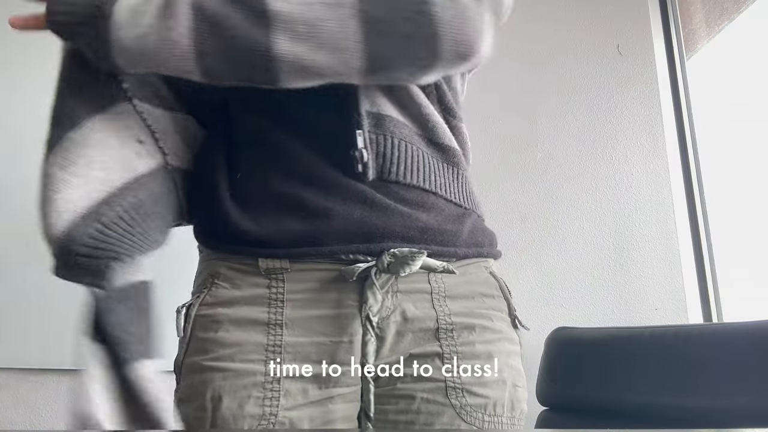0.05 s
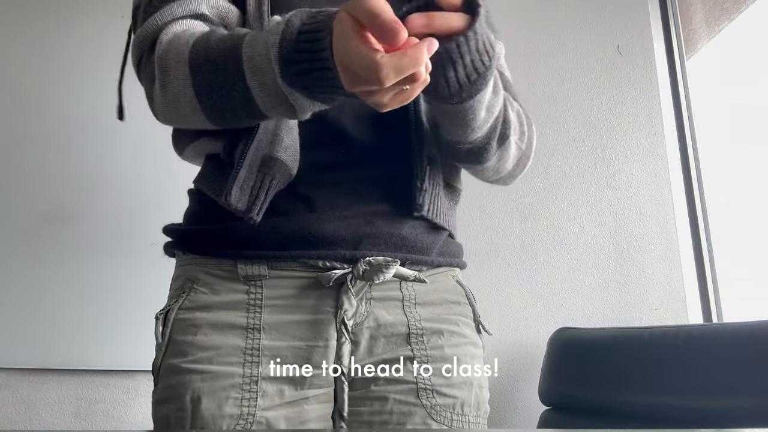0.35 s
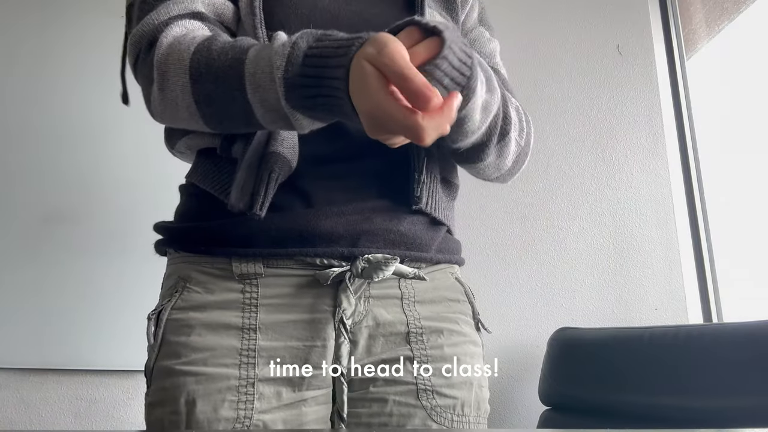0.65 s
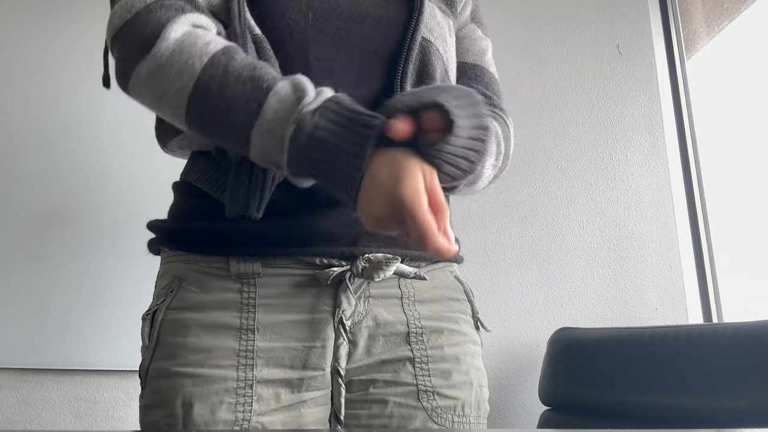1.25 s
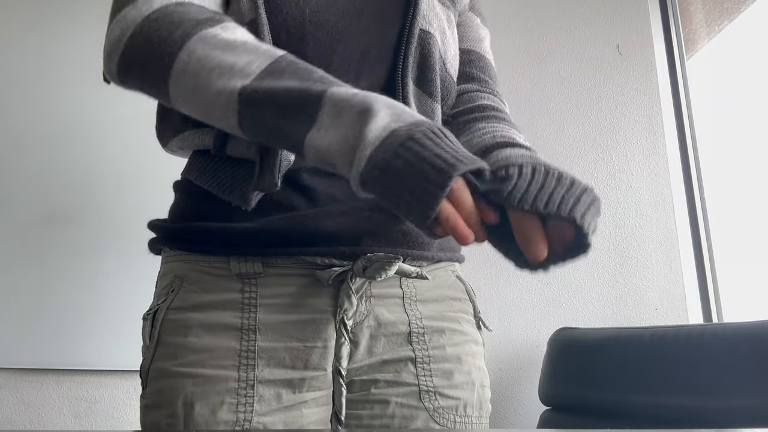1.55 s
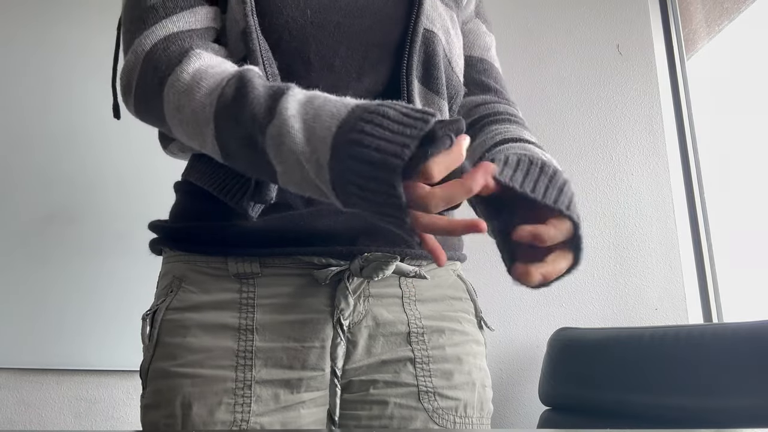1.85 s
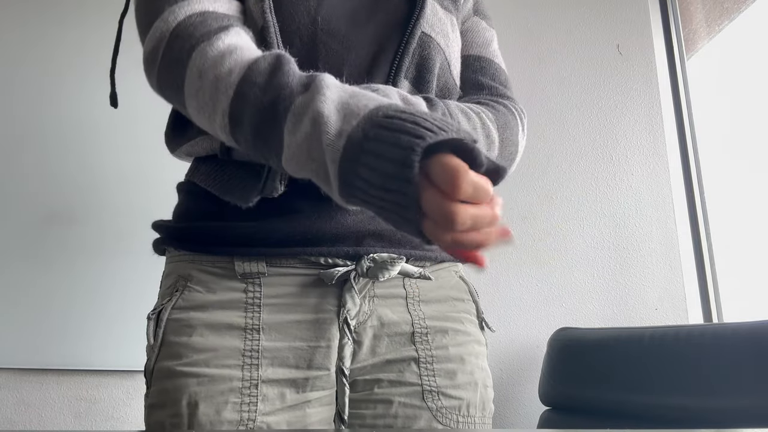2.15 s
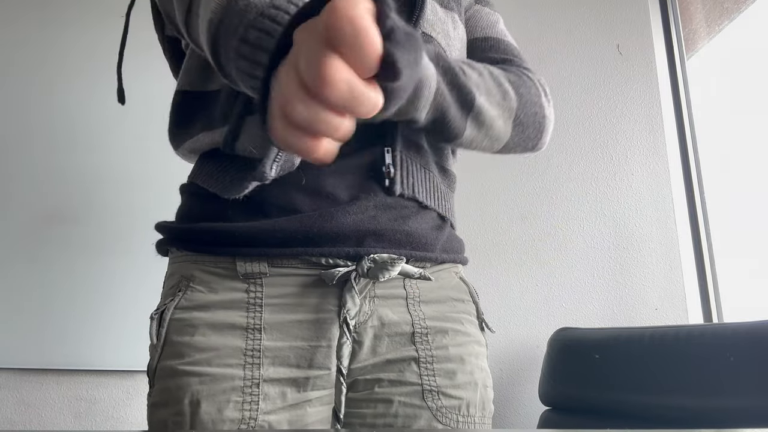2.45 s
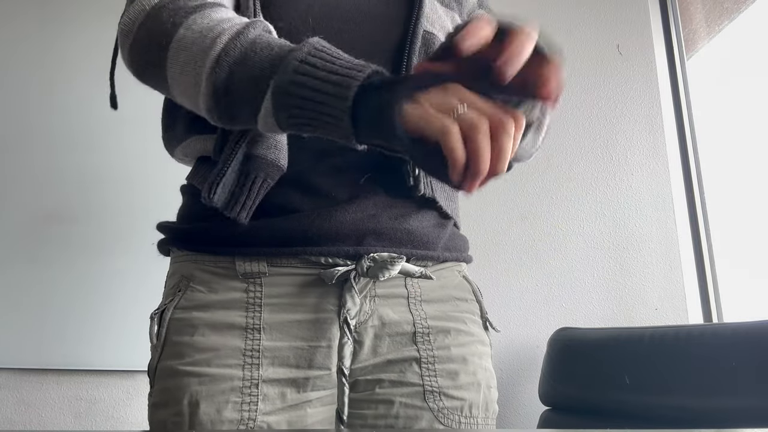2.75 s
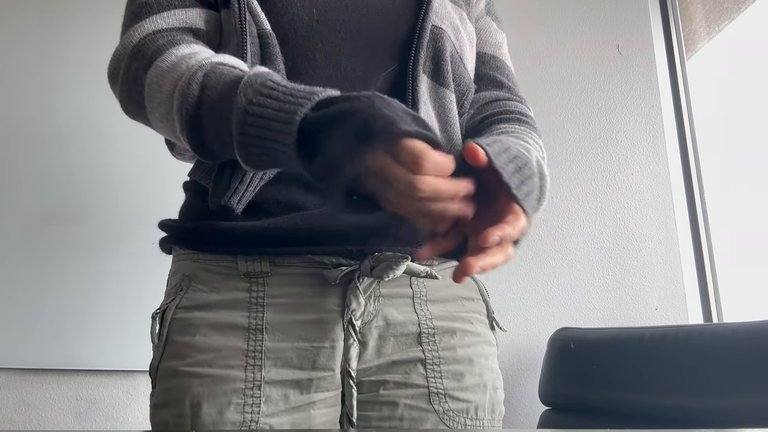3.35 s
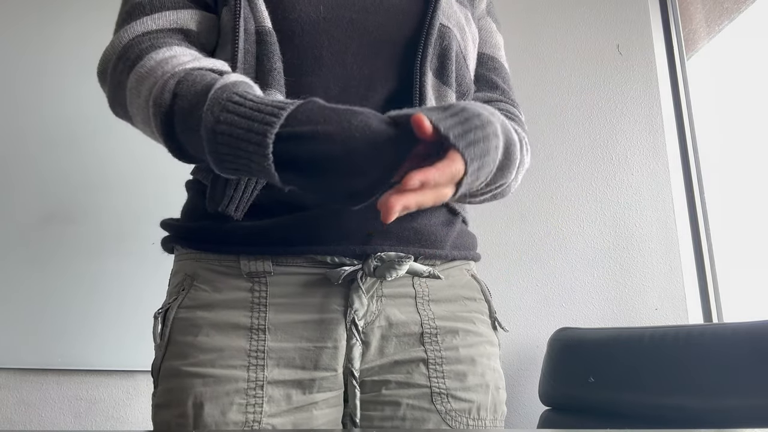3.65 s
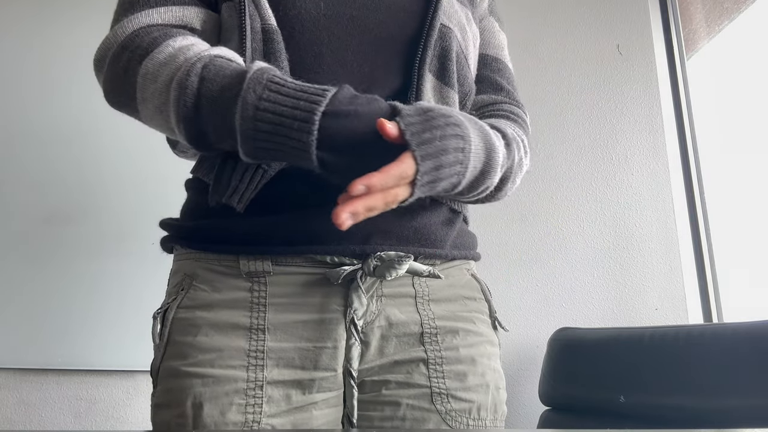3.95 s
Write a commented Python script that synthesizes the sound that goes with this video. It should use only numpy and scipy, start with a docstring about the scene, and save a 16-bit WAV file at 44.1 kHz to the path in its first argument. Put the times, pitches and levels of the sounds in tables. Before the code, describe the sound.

Soft, close rustling of sweater sleeves being pulled and brushed, over a low ventilation hum.

```python
"""Ventilation rumbles and hums throughout in a quiet room. From the first instant, knitted sleeves are
tugged over the wrists close to two microphones: by friction, folds rustle dully and fibres hiss.
Between 0.1 and 0.2 s something small and hard knocks, rebounds and rings on. From about 1 s a fold now
and then flicks free, and the strongest stroke peaks near 1.5 s. From 2 s on, single threads tick
as they snap loose among the continuing strokes."""
import sys
import numpy as np
from scipy import signal
from scipy.fft import rfft, irfft
from scipy.io import wavfile
from scipy.ndimage import uniform_filter1d, map_coordinates

SR = 44100
rng = np.random.default_rng(int(sys.argv[2]) if len(sys.argv) > 2 else 0)


def wrap_up_sound(samples):
    """Save the sound to the file named by the first command line argument, as 16-bit audio."""
    columns = np.atleast_2d(samples).T
    # keep every value between -1 and 1, then stretch to whole-number steps
    tamed = np.clip(columns, -1, 1)
    steps = np.round(tamed * 32767).astype(np.int16)
    wavfile.write(sys.argv[1], SR, steps)


N = 176400
FREQS = np.arange(N // 2 + 1) * SR / N  # f/Hz
FOLD_DIFFUSE = 0.49  # "diffuse" is the share of the power that arrives by way of the walls


def undb(db):
    """Amplitude ratio of a level: a factor of ten per 20 dB."""
    return 10 ** (np.asarray(db) / 20)


def unit(x):
    """Normalisation to an rms of 1."""
    return x / np.sqrt(np.mean(x ** 2))


def over_hz(points):
    """Interpolation of (f/Hz, value) points on a logarithmic frequency axis."""
    hz, value = np.array(points, float).T
    return np.interp(np.log(FREQS + 1e-3), np.log(hz), value)


def resonance(hz, width):
    """Lorentzian resonance curve; width is the full span in Hz at half gain."""
    return 1 / (1 + ((FREQS - hz) / (width / 2)) ** 2)


def soft_band(hz, octaves):
    """Band-pass gain, Gaussian in log frequency."""
    return np.exp(-.5 * (np.log2((FREQS + 1) / hz) / octaves) ** 2)


def wander(t, per_s):
    """Random modulation: a spline through Gaussian values, with a spread near 1."""
    return map_coordinates(rng.standard_normal(4096), [t * per_s], order=3, mode="wrap")


def noise():
    """Three incoherent white noises: the direct sound and the diffuse field at each microphone."""
    return rng.standard_normal((3, N))


def running_rms(pair, samples):
    """Envelope of a stereo signal: the root of its short-time mean power."""
    return np.sqrt(uniform_filter1d(np.mean(pair ** 2, axis=0), size=samples))


def microphones(x, gain, diffuse):
    """Coherent direct sound and an incoherent diffuse field add at two microphones; filtered, rms 1."""
    # phase lead of the left microphone: f/Hz, phase/rad
    left_lead = [(150, 0), (380, 0), (500, -2.4), (640, -2.4), (950, 0), (1400, .4), (2500, 1.3),
                 (4800, 1.3), (6500, .7), (8600, 0), (10000, -.8), (12800, -2.9), (14000, -3.14),
                 (16000, -3.5)]
    # left minus right: f/Hz, level/dB
    left_excess = [(50, -1), (150, 2), (550, 3.5), (1000, -1), (2500, 2), (8000, 0)]
    spectra, side = rfft(x), np.array([[.5], [-.5]])
    direct = np.sqrt(1 - diffuse) * spectra[0] * np.exp(1j * side * over_hz(left_lead))
    reflected = np.sqrt(diffuse) * spectra[1:]
    balance = undb(side * over_hz(left_excess))
    return unit(irfft((direct + reflected) * gain * balance, N))


def ventilation(t):
    """Broadband air noise rumbles beneath the wavering narrow bands of fan hum and duct resonances."""
    # rumble spectrum: f/Hz, relative level/dB
    rumble_spectrum = [(20, -33), (32, -18), (44, 1), (58, 1), (75, -1), (110, -4.5), (190, -7.5),
                       (270, -8), (380, -14.5), (480, -12.5), (580, -19.5), (800, -33), (1050, -36.5),
                       (1400, -40), (2000, -44.5), (3300, -57), (7000, -61), (13000, -64.5), (16000, -48)]
    # reverberant part of the rumble: f/Hz, diffuse share
    rumble_diffuse = [(60, 0.0096), (110, 0.078), (180, 0.31), (330, 0.38), (500, 0.71), (1500, 0.96),
                      (5000, 1), (10000, 0.067)]
    # hum: f/Hz, width/Hz, level/dB, diffuse share, steadiness (0 = narrow noise, 1 = even tone)
    hum_tones = [(58.15, 4.5, -50.5, 0.0098, 0.68), (225.5, 12.6, -47, 0.26, 0.54),
                 (253, 9.4, -54.5, 0.28, .45), (272, 18, -55.5, 0.22, 0.33), (321, 14.4, -62, 0.16, .3),
                 (345.3, 4.4, -60, 0.54, 0.17), (445.8, 16, -58.5, 1, 0.3), (552.4, 11, -63, 0.79, 0.26),
                 (712, 32, -70, 1, 0.26)]
    # wavering of the hum: t/s, level change/dB
    hum_waver = [(0.0, 0.5), (0.15, 1.5), (0.35, -9.5), (0.5, -3.5), (0.61, 5.5), (0.74, -0.5),
                 (0.93, -1.5), (1.13, 2), (1.48, -3.5), (1.7, -4), (2.68, -2.7), (2.94, -0.5), (3.07, -9.5),
                 (3.26, 2.5), (3.37, -3), (3.59, 1.5), (3.73, -5), (3.99, -2.5)]
    rumble = microphones(noise(), undb(over_hz(rumble_spectrum)), over_hz(rumble_diffuse))
    out = rumble * undb(-43.5 + 0.1 * wander(t, per_s=3.09))
    waver_db = np.interp(t, *np.array(hum_waver).T)
    for hz, width, db, diffuse, steadiness in hum_tones:
        band = microphones(noise(), resonance(hz, width), diffuse)
        tone = unit(band / running_rms(band, samples=6001) ** steadiness)
        waver_depth = np.exp(-(np.log2(hz / 233) / .5) ** 2)  # greatest near 233 Hz
        out = out + tone * undb(db + waver_depth * waver_db)
    return out


def knocks(t):
    """Impact excitation: each blow gives a broadband crack and damped resonances that linger."""
    # blows and rebounds: t/s, ring level/dB, crack level/dB
    blows = [(0.1027, -56, -68), (0.105, -57, -60), (0.126, -55.5, -59), (0.143, -58, -66),
             (0.1817, -68, -42), (.186, -72, -54)]
    # resonances: f/Hz, width/Hz, relative level/dB, T60/s
    modes = [(780, 89, -4.5, 0.15), (930, 210, -6, 0.46), (1220, 190, -7, 0.55), (1315, 35, -9.5, .65),
             (1380, 70, -2, 0.52), (1480, 270, -13, 1), (1700, 110, -9, 0.23), (2080, 300, -17, 0.55),
             (2840, 220, -18, 0.7), (3150, 240, -16, 0.49), (4800, 2800, -13.5, 0.4)]
    # crack spectrum: f/Hz, relative level/dB
    crack_spectrum = [(500, 6), (1300, -3), (2200, 1), (3200, 1), (4000, -12), (6000, -15), (9000, -22),
                      (15000, -40)]

    def decay(at, t60):
        """Exponential damping: 60 dB down after t60 seconds."""
        return (t >= at) * np.exp(-np.log(1000) * np.maximum(t - at, 0) / t60)

    crack = microphones(noise(), undb(over_hz(crack_spectrum)), diffuse=0.13)
    out = crack * sum(undb(db) * decay(at, t60=0.016) for at, _, db in blows)
    for hz, width, db, t60 in modes:
        band = microphones(noise(), resonance(hz, width), diffuse=0.88)
        ring = band / running_rms(band, samples=1001)
        power = sum((undb(ring_db) * decay(at, t60)) ** 2 for at, ring_db, _ in blows)
        out = out + ring * undb(db) * np.sqrt(power)
    return out


def thread_ticks(t):
    """Sudden release of tension: a caught thread lets go with a tiny, dry transient."""
    # releases: t/s, level/dB
    releases = [(1.984, -55), (2.094, -58), (3.005, -55), (3.386, -58), (3.901, -63)]
    decay_s = 0.0013
    envelope = sum(undb(db) * (t >= at) * np.exp(-np.maximum(t - at, 0) / decay_s) for at, db in releases)
    return microphones(noise(), soft_band(hz=2330, octaves=0.45), FOLD_DIFFUSE) * envelope


def fold_flicks(t):
    """A slipping fold radiates a soft puff: band-limited noise under a Gaussian envelope."""
    # puffs: t/s, f/Hz, spread/octaves, half-length/s, level/dB
    puffs = [(0.953, 500, 0.58, 0.0077, -51), (0.953, 3800, 1.3, 0.008, -68),
             (1.158, 1350, 0.27, 0.0071, -57.5), (1.174, 600, 0.31, 0.046, -53),
             (1.592, 2650, 0.18, .008, -65), (1.717, 3100, 0.8, 0.023, -63.5),
             (1.826, 2200, 0.79, 0.0088, -64), (2.088, 1410, 0.42, 0.013, -65.5),
             (2.299, 1980, 0.58, 0.012, -59), (2.579, 1890, 0.43, 0.0095, -67),
             (3.123, 2390, 0.52, 0.012, -63.5), (3.188, 2800, 0.66, 0.014, -68),
             (3.385, 2250, 0.6, 0.008, -65.5)]
    out = 0
    for at, hz, octaves, half_length, db in puffs:
        envelope = undb(db) * np.exp(-((t - at) / half_length) ** 2)
        out = out + microphones(noise(), soft_band(hz, octaves), FOLD_DIFFUSE) * envelope
    return out


def stick_slip():
    """Stick-slip friction: threads catch and slip, adding dense, uneven clicks to smooth sliding noise."""
    catches_per_s, spread_db, smooth_share = 2200, 2, 0.58
    x = noise()
    size = undb(spread_db * np.minimum(rng.exponential(size=N), 5))
    clicks = (rng.random(N) < catches_per_s / SR) * size * rng.choice([-1, 1], N)
    direct = np.sqrt(smooth_share) * x[0] + np.sqrt(1 - smooth_share) * unit(clicks)
    return np.vstack([direct, x[1:]])


def rib_snags():
    """Ribs snag as a Poisson process; each gives a brief dip in level, returned in dB."""
    snags_per_s, recovery_s, dip_db = 37, 0.002, -1.5
    hits = (rng.random(N) < snags_per_s / SR) * rng.random(N)
    return dip_db * signal.lfilter([1], [1, -np.exp(-1 / (recovery_s * SR))], hits)


def sleeves(t):
    """Sliding friction of cloth on cloth: strokes add in power, and the grip flutters as the ribs pass."""
    # strokes: start t/s, rise/s, hold/s, release/s, fold level/dB, fibre level/dB, airy level/dB
    strokes = [(-.01, 0.0037, 0.0084, 0.053, -58, -70.5, -68),
               (0.098, 0.0011, .008, 0.067, -59.5, -67, -70), (0.181, .04, .02, 0.066, -61.5, -73.5, -72),
               (0.463, 0.04, 0.017, 0.028, -68, -75.5, -79), (0.561, 0.019, .025, 0.018, -77, -74.5, -78),
               (0.633, .03, 0.14, 0.081, -68, -73.5, -71), (0.918, 0.032, .004, 0.018, -57, -71, -66),
               (0.962, 0.022, 0.047, 0.075, -69, -94, -74), (1.042, 0.048, 0.065, 0.042, -59.5, -72.5, -60),
               (1.132, 0.033, 0.026, 0.12, -57, -66, -55.5), (1.228, 0.053, 0.54, 0.076, -60, -68.5, -59),
               (1.247, 0.23, 0.0058, 0.051, -50, -58, -49), (1.654, 0.04, 0.13, .03, -62, -83, -61),
               (1.867, 0.037, 0.091, 0.072, -65.5, -78, -64), (2.045, 0.027, 0.08, 0.036, -61.5, -73, -66),
               (2.172, 0.027, 0.05, 0.086, -68.5, -79, -64), (2.27, 0.067, 0.069, 0.08, -54, -58, -61),
               (2.488, .012, 0.018, .01, -83, -67, -68), (2.554, 0.032, 0.0032, 0.025, -64, -68, -69.5),
               (2.625, 0.032, .005, 0.041, -63.5, -67.5, -62), (2.705, 0.045, 0.19, .05, -79, -83, -68.5),
               (2.827, 0.015, 0.0056, 0.013, -65, -70.5, -51), (2.954, 0.059, .008, 0.022, -59.5, -76, -56),
               (3.009, 0.024, 0.022, 0.026, -60.5, -66, -59), (3.075, 0.03, 0.059, 0.06, -61, -74, -64),
               (3.143, 0.055, .012, 0.026, -63.5, -75, -55.5),
               (3.358, 0.028, 0.1, 0.053, -69.5, -99, -67.5), (3.482, 0.043, .02, 0.036, -65.5, -80, -59.5),
               (3.563, 0.035, .008, 0.054, -62.5, -76, -60), (3.647, 0.027, 0.14, 0.057, -74, -90, -70),
               (3.71, 0.056, .015, 0.03, -75, -67, -58), (3.877, 0.025, .06, 0.045, -66.5, -78.5, -66)]
    # dull rustle of rubbing folds: f/Hz, relative level/dB
    fold_spectrum = [(150, 13.5), (500, 9), (850, 2), (1300, 1.5), (1750, -4), (2500, 0), (3800, -6),
                     (6000, -7.5), (9000, -20), (15000, -32)]
    # fine hiss of catching fibres: f/Hz, relative level/dB
    fibre_spectrum = [(1500, -7.5), (4000, -13), (6300, -3.5), (8000, 3), (10000, 2), (12000, 4),
                      (14000, -25), (16000, -7.5)]
    # airy top of the hiss: f/Hz, relative level/dB
    airy_spectrum = [(7000, -31), (10000, -11), (11500, -3.5), (13000, 0), (14500, -3), (16000, 0.5)]
    # spectrum, diffuse share, flutter/dB
    layers = [(fold_spectrum, FOLD_DIFFUSE, 1.1), (fibre_spectrum, 0.024, 0.35),
              (airy_spectrum, 0.0078, 0.8)]
    powers = 0
    for start, rise, hold, release, *levels_db in strokes:
        swell = np.clip((t - start) / rise, 0, 1)
        decay = np.exp(-np.maximum(t - start - rise - hold, 0) / release)
        powers = powers + np.outer(undb(levels_db), swell * decay) ** 2
    grip, snag_db = wander(t, per_s=88), rib_snags()
    out = 0
    for (spectrum, diffuse, flutter_db), power in zip(layers, powers):
        rubbing = microphones(stick_slip(), undb(over_hz(spectrum)), diffuse)
        out = out + rubbing * undb(flutter_db * grip + snag_db) * np.sqrt(power)
    return out


def scene():
    """Linear superposition: the pressures of cloth, knocks and ventilation add."""
    t = np.arange(N) / SR
    return sleeves(t) + fold_flicks(t) + thread_ticks(t) + knocks(t) + ventilation(t)


def record(dry):
    """Band limiting: a steep low-pass cuts the top, after a short fade at each end."""
    cutoff_hz, fade_s = 15750, .003
    from_edge = np.minimum(np.arange(N), np.arange(N)[::-1])
    fade = np.minimum(from_edge / (fade_s * SR), 1)
    return signal.sosfilt(signal.ellip(10, .2, 80, cutoff_hz, fs=SR, output="sos"), dry * fade)


dry = scene()
out = record(dry)
wrap_up_sound(out)
```